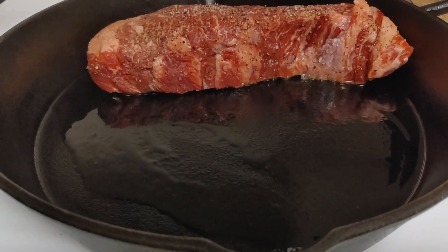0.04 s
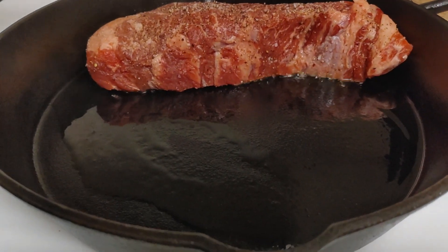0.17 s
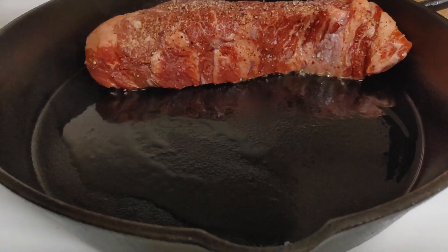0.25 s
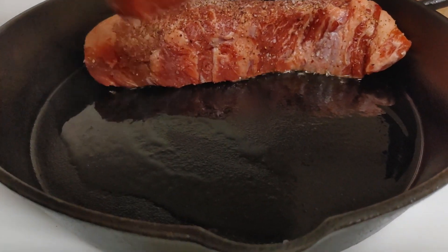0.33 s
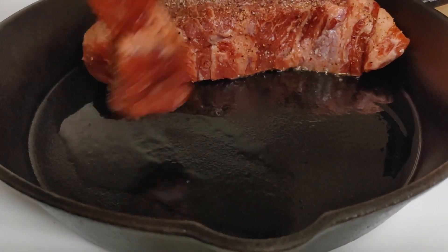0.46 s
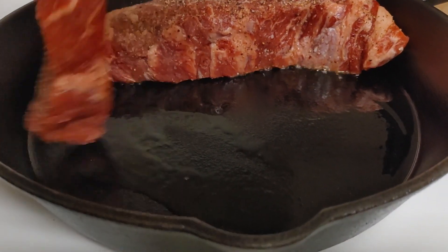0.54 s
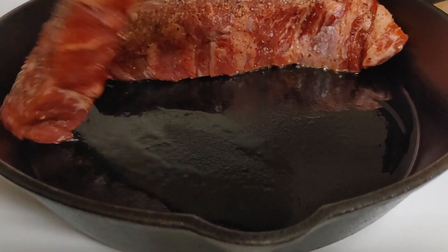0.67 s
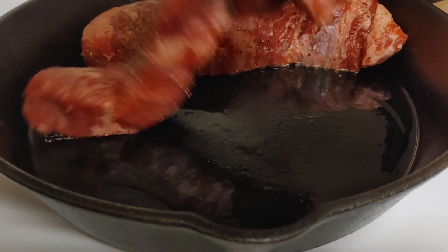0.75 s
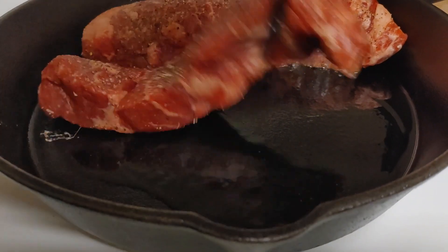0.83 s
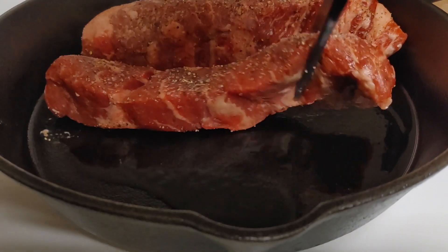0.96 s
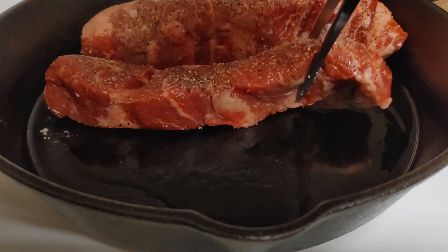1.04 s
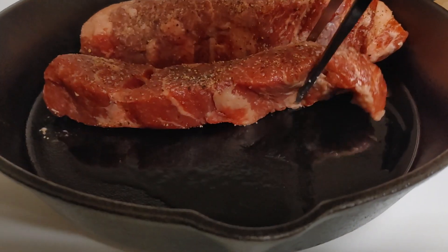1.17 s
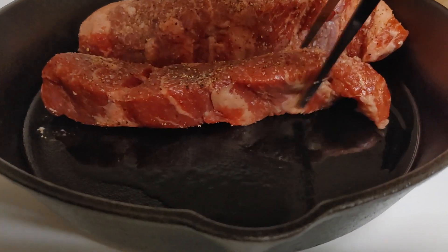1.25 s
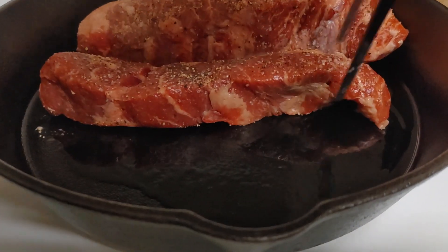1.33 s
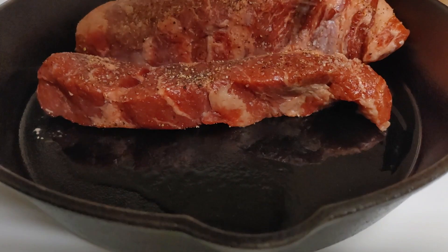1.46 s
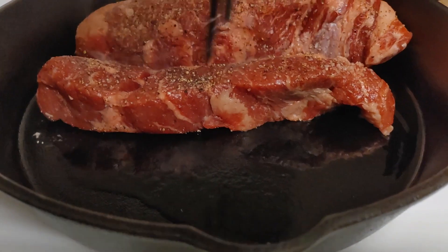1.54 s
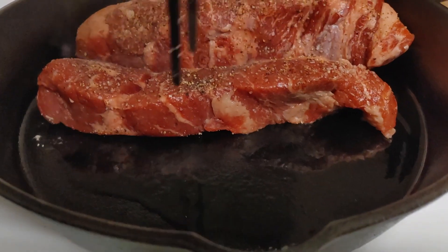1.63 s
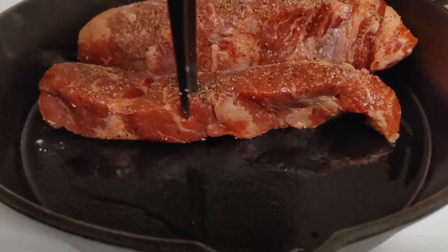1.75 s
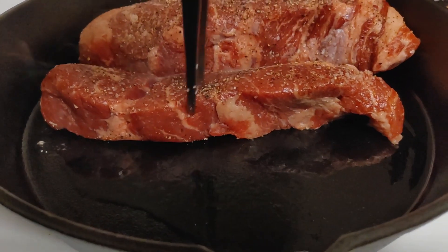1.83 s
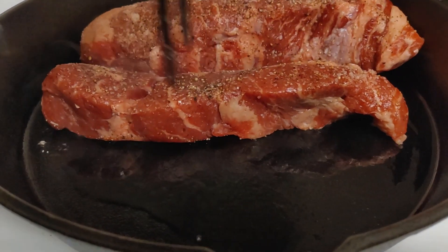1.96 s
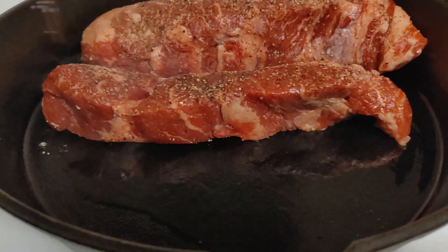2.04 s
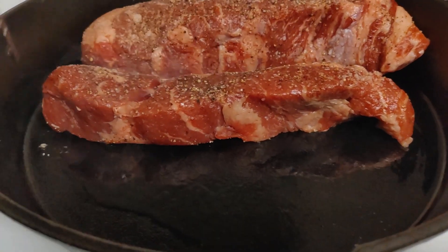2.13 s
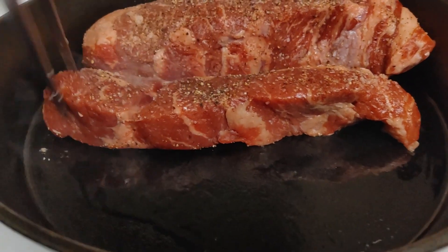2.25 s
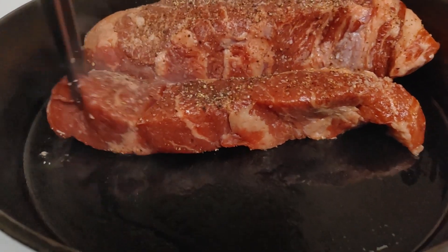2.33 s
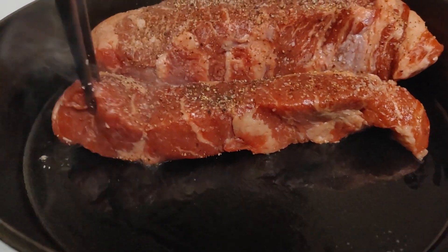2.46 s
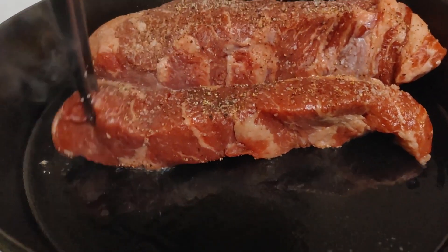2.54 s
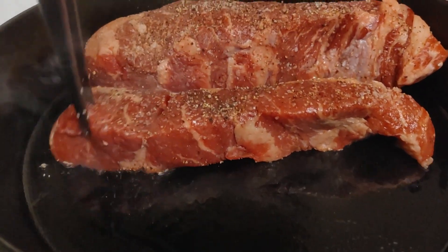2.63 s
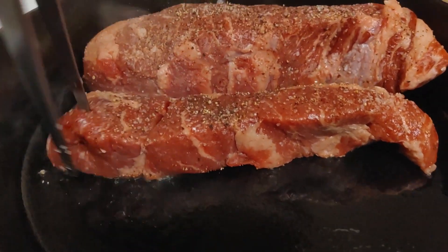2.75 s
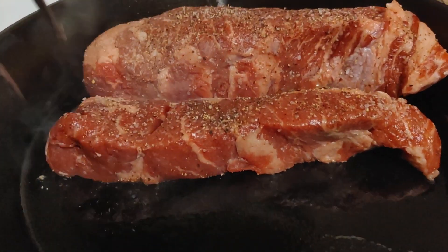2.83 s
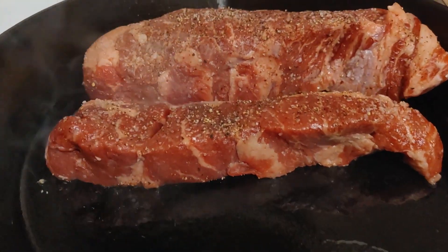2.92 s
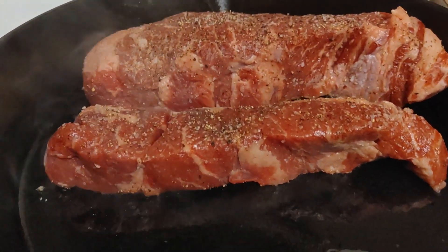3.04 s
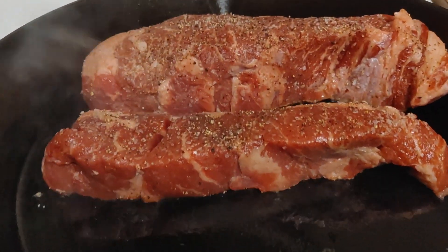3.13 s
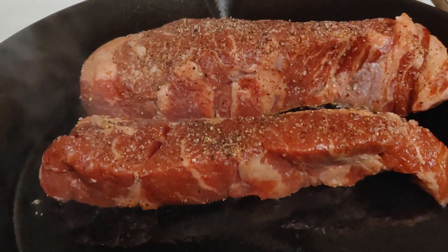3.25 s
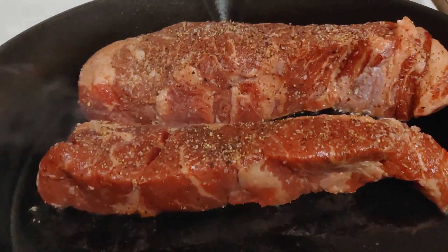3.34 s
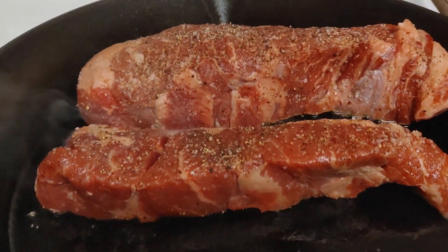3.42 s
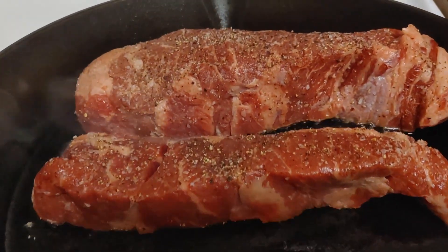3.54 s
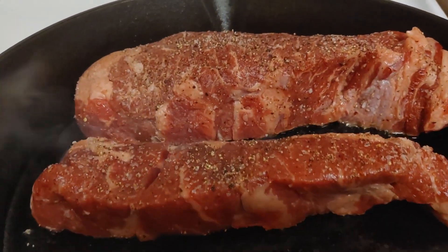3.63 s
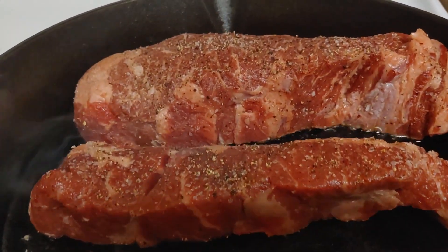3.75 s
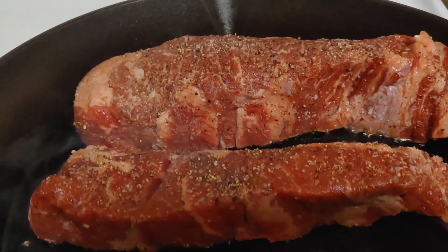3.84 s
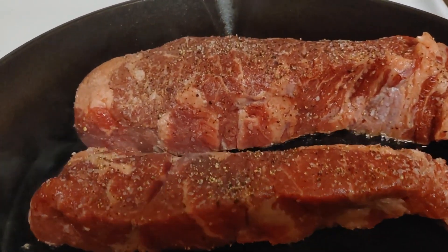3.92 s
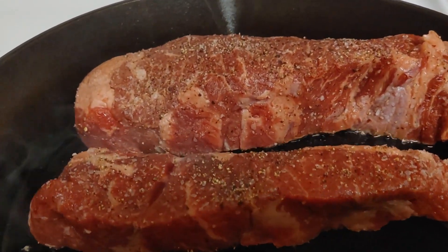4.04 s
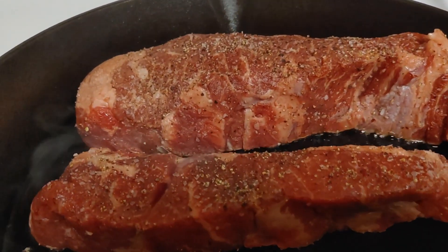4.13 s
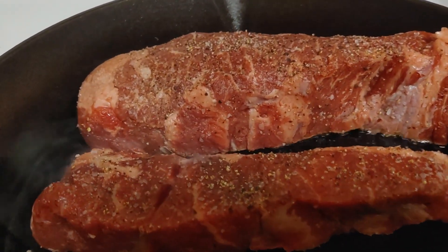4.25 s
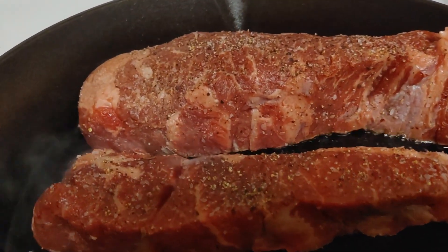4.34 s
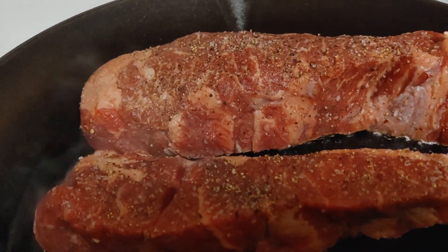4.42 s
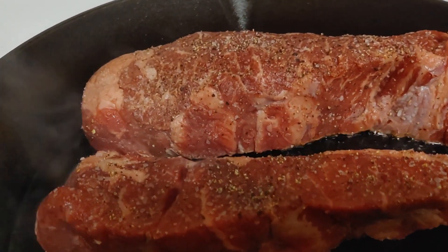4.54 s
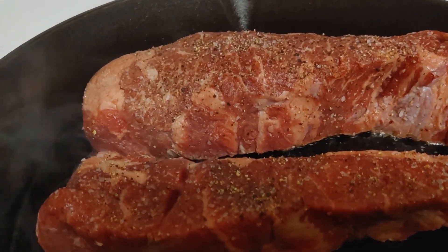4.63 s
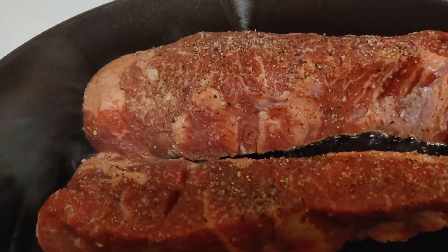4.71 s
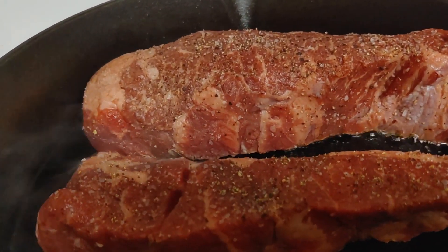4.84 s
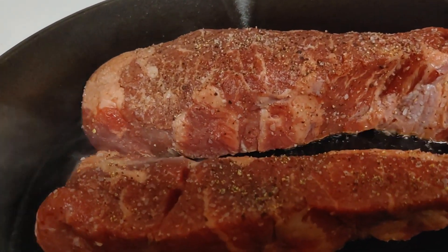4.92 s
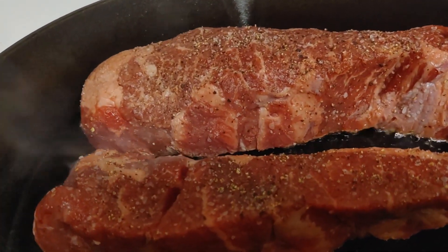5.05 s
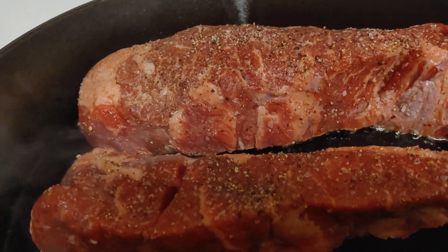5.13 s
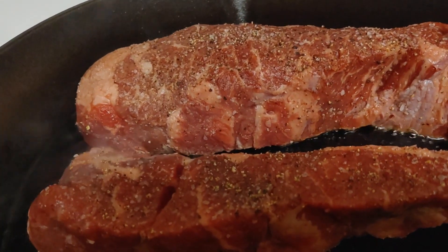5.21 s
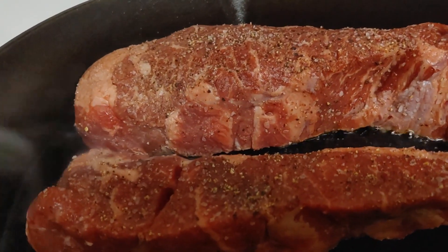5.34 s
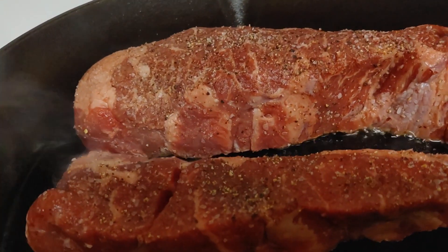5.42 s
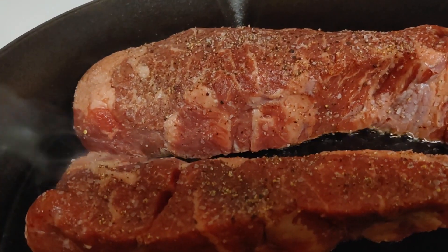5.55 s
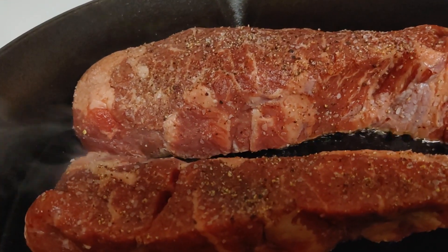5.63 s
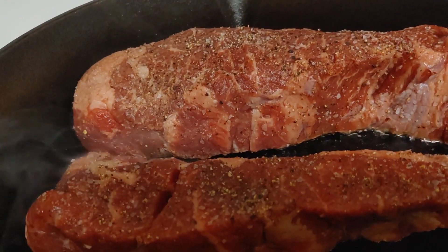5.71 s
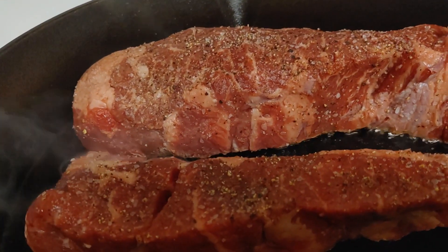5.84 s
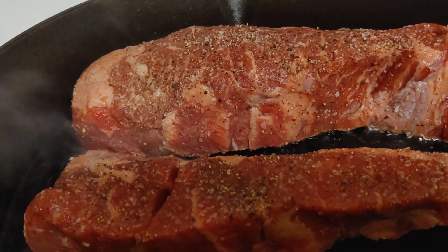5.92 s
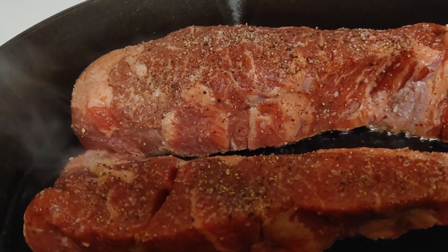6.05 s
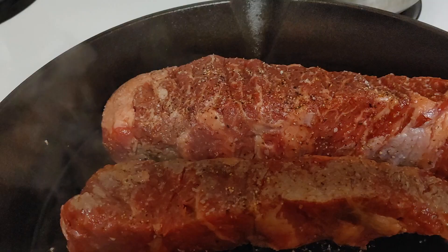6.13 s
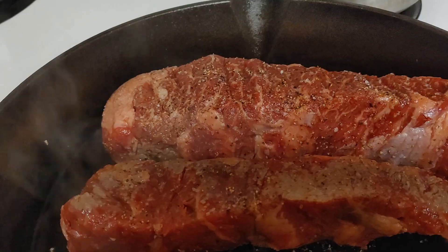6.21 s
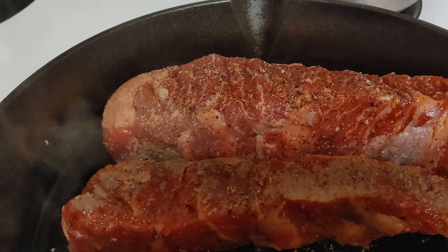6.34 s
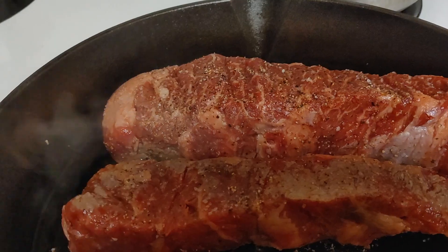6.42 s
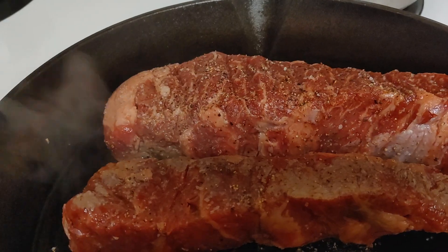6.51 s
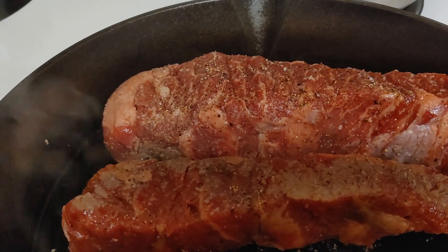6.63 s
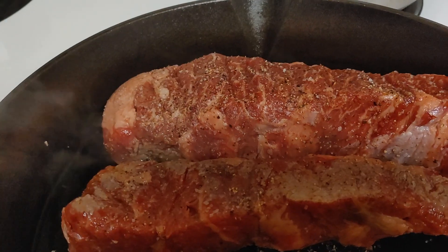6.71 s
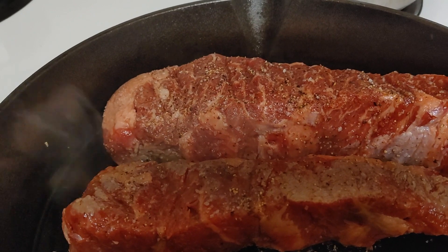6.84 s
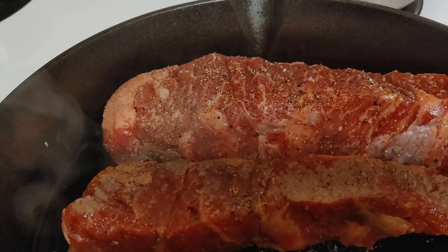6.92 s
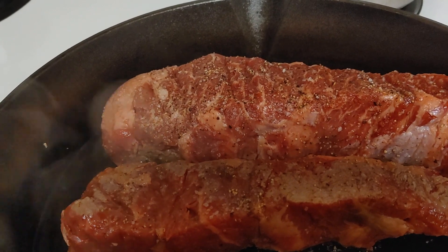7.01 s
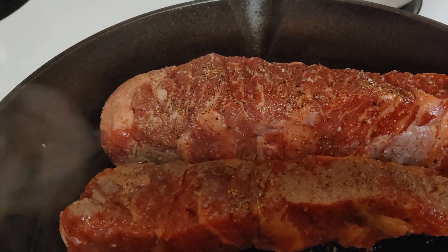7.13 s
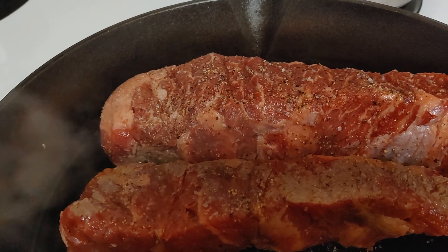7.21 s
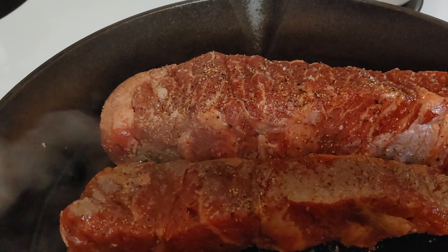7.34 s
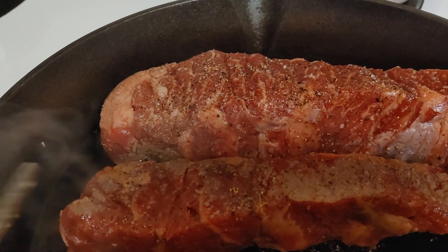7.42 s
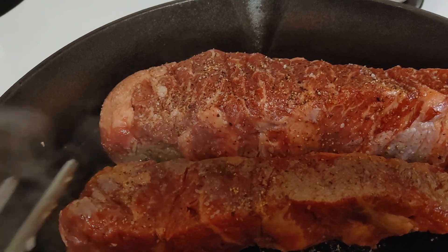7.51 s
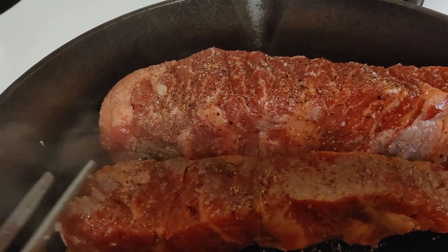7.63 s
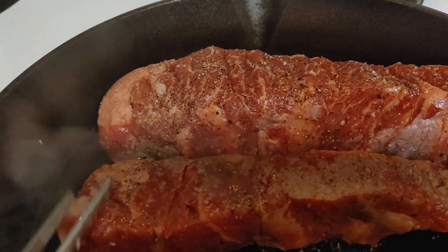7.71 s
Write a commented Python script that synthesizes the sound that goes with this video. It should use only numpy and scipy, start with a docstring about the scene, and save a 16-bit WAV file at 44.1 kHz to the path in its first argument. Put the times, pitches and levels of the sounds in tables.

```python
"""A dense sizzle swells as a second cut of meat is laid in hot oil; fat pops and spits over a deep gurgle.
After a brief near-silent splice the meat has settled and fries more quietly, in a small kitchen.
The sizzle is thousands of short rings from bursting bubbles of four sizes, coloured by a cast iron pan.
Pops are sharp decaying pushes with a noisy snap, spits are ringing cracks, and blips are dull short rings.
Decaying noise tails form the room's answer, and low filtered noise its murmur."""
import sys
import numpy as np
from scipy import signal
from scipy.fft import rfft, irfft, next_fast_len
from scipy.io import wavfile
from scipy.ndimage import map_coordinates

SR = 44100
rng = np.random.default_rng(int(sys.argv[2]) if len(sys.argv) > 2 else 0)


def generate_wav(signal):
    """Clip the signal to [-1, 1] and save it as 16-bit WAV at the path in sys.argv[1]."""
    frames = np.transpose(np.atleast_2d(signal))
    scaled = np.clip(frames, -1, 1) * 32767
    pcm = np.round(scaled).astype(np.int16)
    wavfile.write(sys.argv[1], SR, pcm)


N = 342651
TIME = np.arange(N) / SR

# how hard the juice boils; it leaps as the second cut lands and restarts lower after the splice:
# (time [s], level [dB])
BOIL_LEVEL = [(0.0, -25), (0.78, -25.0), (0.96, -21), (1.17, -19), (1.55, -18), (1.8, -16.5), (2.1, -17.5),
              (2.62, -17.0), (3.3, -18.0), (4.15, -18.5), (5.3, -18.5), (6.16, -19.5), (6.235, -36),
              (6.3, -33), (6.41, -28.5), (6.8, -28.5), (7.05, -27.5), (7.77, -27)]
# the near-silent dip at the splice: (time [s], gain [dB])
SPLICE_DIP = [(6.1655, 0), (6.167, -12), (6.18, -19), (6.183, -44), (6.205, -68), (6.222, -52), (6.23, -34),
              (6.2318, 0)]
RESUME_S = SPLICE_DIP[-2][0]  # the settled meat starts here

LAID_S, LOWERING_S = .75, 0.36  # the second cut touches the oil; time until it lies flat
DRYING_S = 1.5  # decay time of its wetness once flat
FULL_BOIL_DB = -18  # the boil with both cuts frying
BUBBLING_DB, CRACKLE_DB, FIZZ_DB = -22, -6, -1.42  # large, medium and small bubbles against the boil
BUBBLING_FOLLOWS = 0.67  # dB of large bubbles per dB of boil
GURGLE_DB, TRAPPED_DB = -15, 8  # deep gurgle against the bubbling; its rise as the second cut traps juice
# a wet face makes louder large and small bubbles and quieter medium ones
WET_BUBBLING_DB, WET_CRACKLE_DB, WET_FIZZ_DB = 1.7, -1.64, 0.56
# settled meat makes coarser bubbles, and its fizz keeps fading
SETTLED_BUBBLING_DB, SETTLED_CRACKLE_DB, SETTLED_FIZZ_DB = 3.5, -1.2, -1.5
FIZZ_FADE_DB_PER_S = -2.6
POP_BRIGHT_HZ, POP_BRIGHTENS_HZ_PER_DB = 2030, 45  # venting rate of a strong pocket; weaker ones are slower
STRONG_POP_DB = -12  # table level of that strong pocket
SPITS_PER_S, SPIT_OVER_BOIL_DB, SPIT_SPREAD_DB = 6, 10.5, 1.5  # lesser droplets, before the common trim
SPIT_LOW_HZ, SPIT_HIGH_HZ = 3600, 11400  # their range of pitch
SPIT_LEAN_DB, SPIT_SCATTER_DB = -1, 4  # left-right balance of all droplets and its spread
RIGHT_LAG = .0041  # delay of the right channel, s
TOP_HZ = 15800  # upper band limit


def amp(db):
    """Decibels to gain."""
    return 10 ** (np.asarray(db) / 20)


def unit(x):
    """x at rms 1."""
    return x / np.sqrt(np.mean(x ** 2) + 1e-20)


def along(points, hz):
    """(Hz, value) points read on a log frequency axis."""
    f, v = np.transpose(points)
    return np.interp(np.log(hz + 1), np.log(f + 1), v)


def curves(rows):
    """One value per sample for each column after the time."""
    s, *cols = np.transpose(rows)
    return [np.interp(TIME, s, c) for c in cols]


def wobble(rate):
    """A smooth random curve, rate knots a second."""
    knots = rng.standard_normal(int(N * rate / SR) + 4)
    return map_coordinates(knots, [TIME * rate])


def filtered(x, response):
    """x times a response of frequency."""
    m = next_fast_len(N + SR // 2)
    hz = np.fft.rfftfreq(m, 1 / SR)
    return irfft(rfft(x, m) * response(hz), m)[..., :N]


def sides(balance_db):
    """Left and right gains of mean power 1; a positive balance favours the left."""
    g = amp(np.array([balance_db, -balance_db]) / 2)
    return g / np.sqrt(np.mean(g ** 2, axis=0))


def add(track, s, sound):
    """Lay a stereo sound into the track at s seconds."""
    part = track[:, max(round(s * SR), 0):][:, :sound.shape[1]]
    part += sound[:, :part.shape[1]]


def sizzle():
    """Bubbles of four sizes burst in the oil; steam escapes in flurries that lift and ease them together."""
    # colour of each bubble size: (frequency [Hz], gain [dB])
    deep_colour = [(25, -50), (70, -22.5), (160, -20.5), (330, -10), (430, -6.5), (520, 0), (760, -0.5),
                   (900, -1.5), (1200, -4.5), (2500, -40)]
    large_colour = [(150, -44), (450, -31), (700, -3), (1000, -2), (1500, 6.5), (2000, 3), (2600, 1.5),
                    (4500, -45)]
    medium_colour = [(900, -53), (1900, -18.5), (2400, -8), (2850, -4), (3300, -4.5), (3900, -1),
                     (4500, -1), (5400, -4.5), (6500, -17), (9000, -40)]
    small_colour = [(3000, -60), (5200, -9.5), (6300, -2), (7400, -2), (8600, -0.5), (9700, -4),
                    (10600, -3), (11600, 0.3), (12150, -2), (12850, -22), (14200, -10.5), (15700, -12.5)]
    # small and medium bubbles lean between the sides as the camera moves: (time [s], left-right [dB])
    camera_lean = [(0, 0.6), (1.8, 1.8), (3.6, -.5), (6.15, -.5), (6.4, 3.5), (6.75, 3.5), (7.3, 0.5)]
    # colour of the sizzle once the meat has settled: (frequency [Hz], gain [dB])
    settled_colour = [(500, -2), (1300, 1), (2600, 2), (3900, 5), (4700, 6), (6500, 5.5), (8600, 0.5),
                      (10800, 3), (12000, 3.5), (14500, -0.5)]

    gurgle_db, bubbling_db, crackle_db, fizz_db = bubble_levels()
    flurry = 0.25 * wobble(14) + 0.26 * wobble(90)  # dB
    deep = bursts(rate=1200, low_hz=199, high_hz=1216, cycles=0.24,
                  spread_db=6.0, scatter_db=5.5, width_ms=0.12, size=200)
    large = bursts(rate=3200, low_hz=600, high_hz=2730, cycles=0.19,
                   spread_db=6.0, scatter_db=2.5, width_ms=0.14, size=128)
    medium = bursts(rate=6000, low_hz=1860, high_hz=6640, cycles=0.56,
                    spread_db=4.0, scatter_db=1, width_ms=0.259, size=128)
    small = bursts(rate=7500, low_hz=4840, high_hz=15830, cycles=0.97,
                   spread_db=2.0, scatter_db=4, width_ms=0.2567, size=80)
    gurgle = amp(gurgle_db + flurry) * from_pan(deep, deep_colour, room_db=-6.0)
    bubbling = amp(bubbling_db + flurry) * from_pan(large, large_colour, room_db=-5.5)
    # the two finer sizes also flicker on their own
    crackle_level = amp(crackle_db + flurry + 0.13 * wobble(30))
    crackle = crackle_level * from_pan(medium, medium_colour, room_db=-7.0)
    fizz_level = amp(fizz_db + flurry + 0.23 * wobble(30))
    fizz = fizz_level * from_pan(small, small_colour, room_db=-4.0)
    fresh = gurgle + bubbling + (crackle + fizz) * sides(curves(camera_lean)[0])
    settled = filtered(fresh, lambda hz: amp(along(settled_colour, hz)))
    return np.where(TIME < RESUME_S, fresh, settled)


def bubble_levels():
    """Gurgle, bubbling, crackle and fizz in dB: all follow the boil; wet meat fizzes, settled meat bubbles."""
    boil_db, = curves(BOIL_LEVEL)
    since_splice = TIME - RESUME_S
    settled = since_splice > 0
    wetness = contact() * np.exp(-np.maximum(TIME - LAID_S - LOWERING_S, 0) / DRYING_S)
    large_boil_db = FULL_BOIL_DB + BUBBLING_FOLLOWS * (boil_db - FULL_BOIL_DB)
    bubbling_db = large_boil_db + BUBBLING_DB + WET_BUBBLING_DB * wetness + settled * SETTLED_BUBBLING_DB
    gurgle_db = bubbling_db + GURGLE_DB + TRAPPED_DB * contact()
    crackle_db = boil_db + CRACKLE_DB + WET_CRACKLE_DB * wetness + settled * SETTLED_CRACKLE_DB
    settled_fizz_db = settled * (SETTLED_FIZZ_DB + FIZZ_FADE_DB_PER_S * since_splice)
    fizz_db = boil_db + FIZZ_DB + WET_FIZZ_DB * wetness + settled_fizz_db
    return gurgle_db, bubbling_db, crackle_db, fizz_db


def contact():
    """Share of the second cut that lies in the oil."""
    return np.clip((TIME - LAID_S) / LOWERING_S, 0, 1)


def bursts(rate, low_hz, high_hz, cycles, spread_db, scatter_db, width_ms, size):
    """Bubbles burst all over the pan: each a short ring with its own pitch, strength and place."""
    count = int(rate * N / SR)
    when, pitch = rng.random((2, count, 1))
    strength, life, place, side = rng.standard_normal((4, count, 1))
    hz = low_hz + (high_hz - low_hz) * pitch
    decay = cycles * np.exp(life / 2) / hz
    gain = amp(spread_db * np.minimum(strength, 2.7)) / np.sqrt(decay)
    ports = []
    for sign, port_gain in zip((1, -1), sides(scatter_db * side)):
        # a burst off to one side reaches the two microphone ports at different times
        start = when * N + sign * place * width_ms * SR / 2000
        index = np.ceil(start).astype(int) + np.arange(size)
        t = ((index - start) / SR).astype(np.float32)
        age = t / decay.astype(np.float32)
        # each ring rises smoothly to its peak, then dies
        ring = age * np.exp(-age) * np.sin((2 * np.pi * hz).astype(np.float32) * t)
        slots = np.clip(index, 0, N).ravel()
        ports.append(np.bincount(slots, (gain * port_gain * ring).ravel(), N + 1)[:N])
    return unit(np.array(ports))


def from_pan(x, spectrum, room_db):
    """Bursts coloured by the pan, the room and the microphone ports, at rms 1."""
    # how the two ports differ: (frequency [Hz], left-right [dB])
    port_balance = [(150, -3), (450, 0.5), (1100, 1.5), (2000, -1.5), (2500, -3), (3300, -3.5),
                    (4200, -5.5), (5500, -3.5), (7500, -1), (9000, -3), (10300, 1), (12000, -0.5),
                    (15000, -1.5)]
    heard = x + amp(room_db) * kitchen(x)
    return unit(filtered(
        heard, lambda hz: amp(along(spectrum, hz)) * pan_ring(hz) * sides(along(port_balance, hz))))


def pan_ring(hz):
    """The direct sound plus the resonances of air ringing between the walls of the pan."""
    # resonances: (centre [Hz], width [Hz], level [dB])
    pan_modes = [(546, 30, -12), (763, 40, -4.5), (1011, 55, 3), (1124, 160, -1.5), (1445, 360, -8),
                 (3980, 230, -15)]
    return 1 + sum(amp(db) * 1j * hz * w / (c * c - hz * hz + 1j * hz * w) for c, w, db in pan_modes)


def pops(low_hz=150, level_db=-8, snap_db=-5, snap_s=.0004, snap_low_hz=900, snap_high_hz=3000, room_db=-12):
    """A steam pocket lets go: one sharp push of air, brighter when strong, and the snap of the torn film."""
    # the strongest pockets under the meat: (time [s], level before trim [dB], left-right [dB])
    steam_pockets = [(0.326, -32, -16), (1.487, -19, 15), (1.7986, -22, 5), (2.093, -19, 19),
                     (2.1999, -28, -14), (2.2358, -24, -16), (2.621, -20.5, 2), (2.7121, -11, -15),
                     (2.807, -20, 4), (2.9189, -21, 16), (3.0013, -13.5, -26), (3.1743, -17, 26),
                     (3.2268, -18, -17), (3.643, -22, 1), (4.087, -25, -20), (4.5321, -22.5, 24),
                     (4.7926, -18.5, 22), (5.026, -17.5, 23), (5.2863, -19.5, 3), (5.3274, -10.5, -6),
                     (5.3406, -16, 8), (5.444, -11.5, 15), (5.905, -25, -11), (5.9538, -16.5, 1),
                     (6.0315, -12, -28), (6.2313, -27, 18), (6.4105, -36, 16), (6.5113, -32, 15),
                     (6.922, -35, 13), (7.448, -26.5, 17), (7.5252, -25, 20)]
    track, t = np.zeros((2, N)), np.arange(SR // 40) / SR
    film = signal.butter(2, [snap_low_hz, snap_high_hz], "bandpass", fs=SR, output="sos")
    for s, db, balance_db in steam_pockets:
        bright_hz = max(POP_BRIGHT_HZ + POP_BRIGHTENS_HZ_PER_DB * (db - STRONG_POP_DB), low_hz)
        push = np.exp(-2 * np.pi * bright_hz * t)  # the pressure jumps, then vents
        snap = signal.sosfilt(film, np.exp(-t / snap_s) * rng.standard_normal((2, len(t))))
        gain = -2 * np.pi * amp(db + level_db) * sides(balance_db)[:, None]
        add(track, s, gain * (push + amp(snap_db) * snap))
    # so small a source radiates little bass, and the meat muffles the top
    muffle = signal.butter(2, [low_hz, 6000], "bandpass", fs=SR, output="sos")
    track = signal.sosfilt(muffle, track)
    return track + amp(room_db) * kitchen(filtered(track, pan_ring))


def spits(level_db=-2.5, cycles=2.8, room_db=-8):
    """A droplet flashes to steam: a crack and a few cycles of ring."""
    # the loudest droplets: (time [s], level before trim [dB], pitch [Hz])
    loud_droplets = [(.326, -6, 6900), (.333, -5, 8600), (.7101, -9.5, 3530), (1.7988, 0, 11200),
                     (2.6207, 1, 7600), (2.7118, 2, 8500), (3.6446, 3, 7400), (4.396, 3.5, 11000),
                     (5.2859, -2, 4740), (5.521, 1, 8600), (5.7327, -4, 6200), (6.032, -2, 7100),
                     (6.0765, 0, 3900), (6.423, -8, 6900), (6.989, -5.5, 4470), (7.0718, -4, 11200),
                     (7.4624, -9, 4100), (7.5248, -11, 4300)]
    track, t = np.zeros((2, N)), np.arange(SR // 100) / SR
    for s, db, hz in list(loud_droplets) + droplets():
        balance_db = SPIT_LEAN_DB + SPIT_SCATTER_DB * rng.standard_normal()
        ring = np.exp(-t * hz / cycles) * np.sin(2 * np.pi * (hz * t + rng.random((2, 1))))
        crack = .35 * np.exp(-t / .0005) * rng.standard_normal((2, len(t)))
        add(track, s, amp(db + level_db) * sides(balance_db)[:, None] * (ring + crack))
    colour = [(300, -25), (1800, -10), (3000, 0), (12000, 0), (13000, -13)]  # (frequency [Hz], gain [dB])
    track = filtered(track, lambda hz: amp(along(colour, hz)))
    return track + amp(room_db) * kitchen(track)


def droplets():
    """Rows (time [s], level before trim [dB], pitch [Hz]) of lesser spits that follow the boil."""
    when, pitch = rng.random((int(SPITS_PER_S * N / SR), 2)).T
    boil_db = curves(BOIL_LEVEL)[0][(when * N).astype(int)]
    db = boil_db + SPIT_OVER_BOIL_DB + SPIT_SPREAD_DB * rng.standard_normal(len(when))
    hz = SPIT_LOW_HZ * (SPIT_HIGH_HZ / SPIT_LOW_HZ) ** pitch
    return list(zip(when * N / SR, db, hz))


def blips(level_db=-19):
    """Faint, dull pops of lesser pockets, stronger when more juice is trapped."""
    pockets = bursts(rate=13, low_hz=200, high_hz=900, cycles=.12,
                     spread_db=2.5, scatter_db=2, width_ms=.1, size=256)
    colour = [(25, -26), (110, 6), (220, -5), (900, -1), (2500, -2)]  # (frequency [Hz], gain [dB])
    gurgle_db = bubble_levels()[0]
    return amp(gurgle_db + level_db) * from_pan(pockets, colour, room_db=-6)


def kitchen(x, count=26):
    """Diffuse answer of the room, made of decaying noise tails redrawn about every 0.3 s."""
    # decay of the small kitchen: (frequency [Hz], time to fall 60 dB [s])
    room_decay = [(200, 0.12), (2000, 0.39), (12000, 0.2)]
    wet = np.zeros((2, N))
    for part in np.array_split(np.arange(N), count):
        hz, t, z = signal.stft(rng.standard_normal((2, SR // 5)), SR, nperseg=256)
        fade = amp(-60 * t / along(room_decay, hz)[:, None])
        tail = signal.istft(z * fade, SR, nperseg=256)[1]
        tail = np.pad(tail, ((0, 0), (SR // 400, 0)))  # gap before the reflections
        add(wet, part[0] / SR, signal.fftconvolve(x[:, part], tail / np.linalg.norm(tail[0]), axes=1))
    return wet


def room_tone(level_db=-75.0, uneven_db=10):
    """A faint, uneven low murmur of room air, made of filtered noise."""
    # (frequency [Hz], gain [dB])
    colour = [(20, -22), (45, -13), (70, 1.5), (125, -7), (220, 2), (400, -24), (4000, -42)]
    air = unit(filtered(rng.standard_normal((2, N)), lambda hz: amp(along(colour, hz))))
    return amp(level_db + uneven_db * np.tanh(wobble(25))) * air


def scene():
    """The frying, its pops and spits, and the room air."""
    return sizzle() + pops() + blips() + spits() + room_tone()


def record(dry):
    """The splice dips the sound, the right channel runs late, peaks round off and the top is band-limited."""
    left, right = dry * amp(curves(SPLICE_DIP)[0])
    late = np.array([left, np.roll(right, round(RIGHT_LAG * SR))])
    rounded = late / (1 + (late / .88) ** 8) ** (1 / 8)
    return filtered(rounded, lambda hz: np.clip((TOP_HZ - hz) / 100, 0, 1))


dry = scene()
out = record(dry)
generate_wav(out)
```